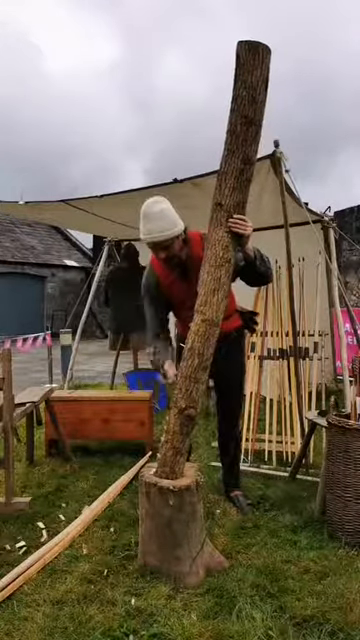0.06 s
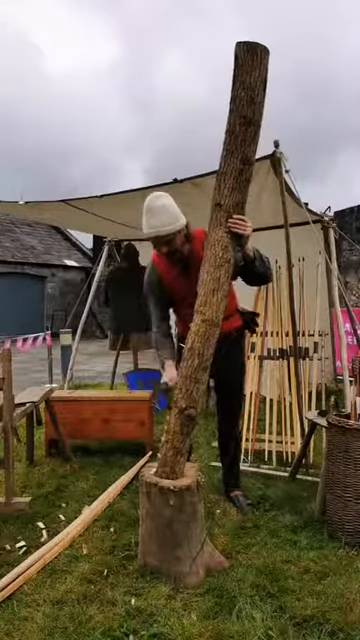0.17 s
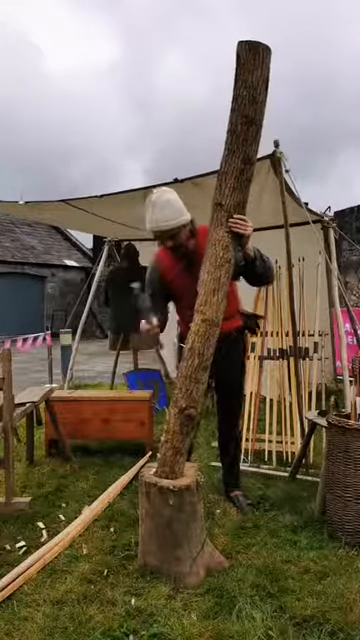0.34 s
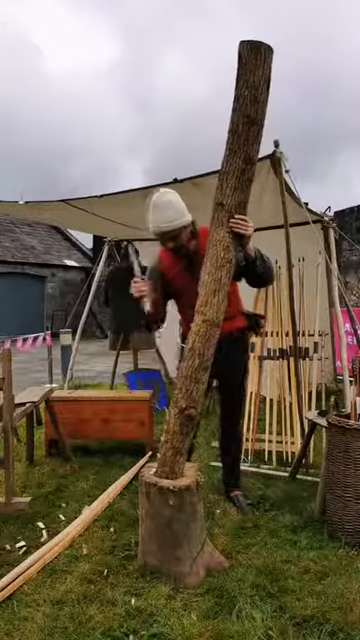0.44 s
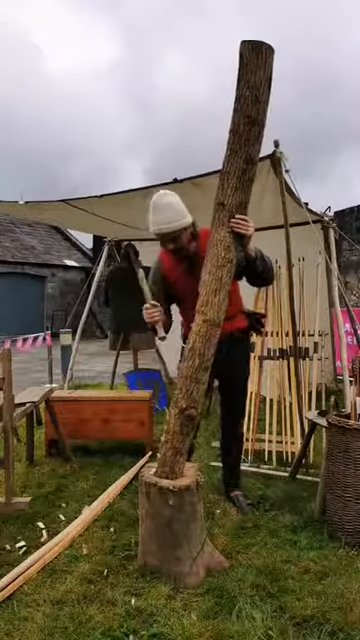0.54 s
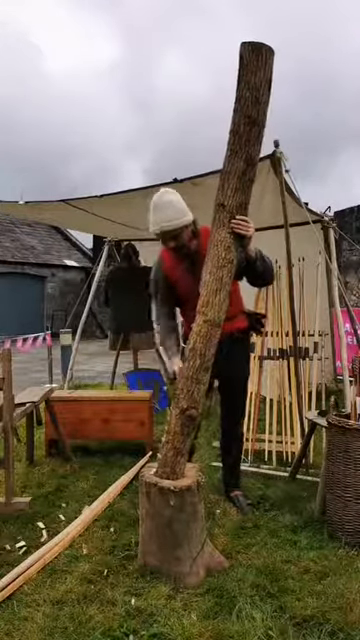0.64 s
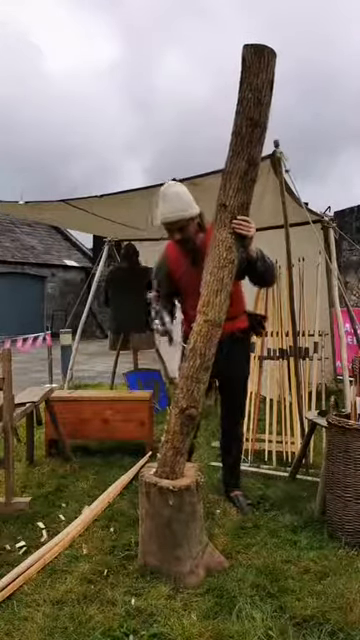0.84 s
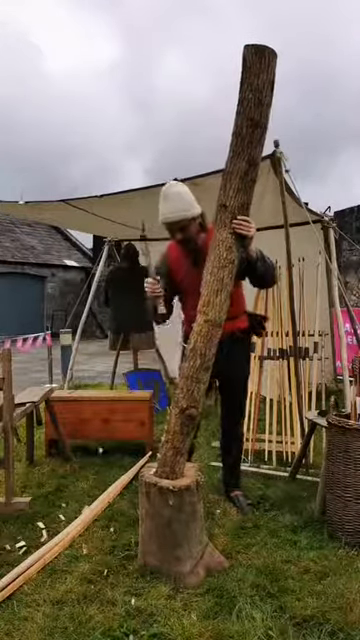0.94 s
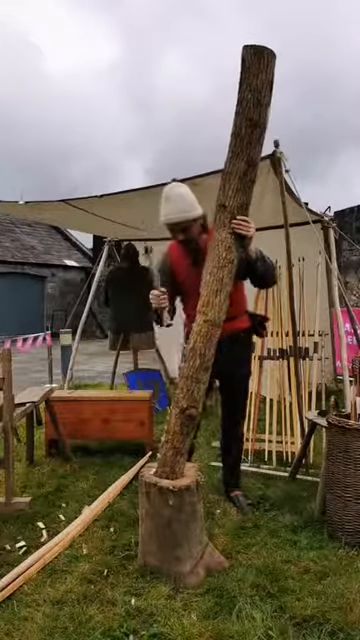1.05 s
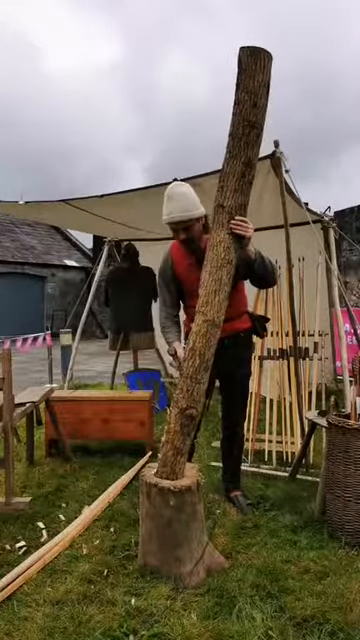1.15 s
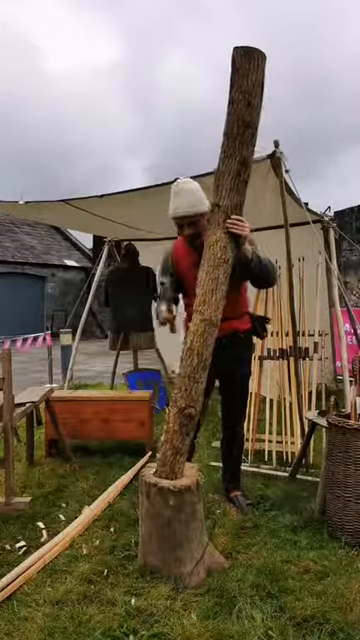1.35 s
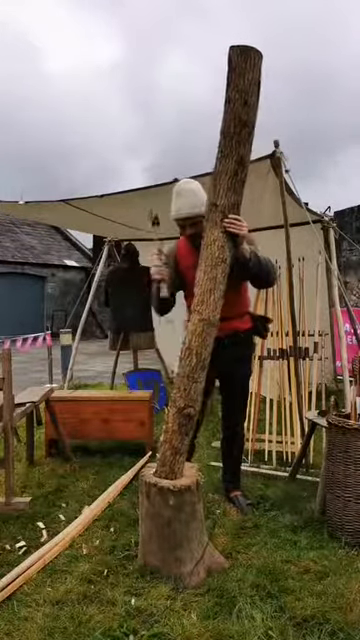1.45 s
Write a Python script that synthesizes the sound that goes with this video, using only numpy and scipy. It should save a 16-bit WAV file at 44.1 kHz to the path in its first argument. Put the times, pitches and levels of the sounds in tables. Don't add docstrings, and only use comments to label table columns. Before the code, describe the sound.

A side axe chops three times into a wooden stave, evenly spaced, in an open yard

```python
import sys
import numpy as np
from scipy import signal
from scipy.fft import rfft, irfft
from scipy.io import wavfile
from scipy.ndimage import uniform_filter1d

SR = 44100
rng = np.random.default_rng(int(sys.argv[2]) if len(sys.argv) > 2 else 0)


def dump(signal):
    limited = np.clip(np.atleast_2d(signal).T, -1, 1)
    pcm = np.round(limited * 32767).astype(np.int16)
    wavfile.write(sys.argv[1], SR, pcm)


def gain_from_db(level_db):
    decades = np.asarray(level_db, float) / 20
    return 10 ** decades


N = 66150


def read(points, hz):
    f, value = np.transpose(points)
    return np.interp(np.log(hz + 1), np.log(f + 1), value)


def evened(x):
    return x / np.sqrt(np.mean(x ** 2) + 1e-20)


def add(mix, start_s, sound):
    part = mix[round(start_s * SR):][:len(sound)]
    part += sound[:len(part)]


def ring(hz, db, t60_s, turn=0, rise_s=0.0002):
    t = np.arange(SR // 2) / SR
    decay = gain_from_db(db - 60 * t / max(t60_s, .003))
    onset = 1 - np.exp(-(t / rise_s) ** 2)
    return decay * np.sin(2 * np.pi * (hz * t + turn)) * onset


def filtered(x, order, edge_hz, kind):
    return signal.sosfilt(signal.butter(order, edge_hz, kind, fs=SR, output='sos'), x)


def noise(colour, patchy_db, t60=None):
    hz = np.fft.rfftfreq(256, 1 / SR)
    patches = rng.standard_normal((N // 64 + 9, 129))
    patches = uniform_filter1d(patches, size=24, axis=0)
    patches = evened(uniform_filter1d(patches, size=3, axis=1)).T
    _, t, z = signal.stft(rng.standard_normal(N), SR, nperseg=256, noverlap=192)
    fall_db = 0 if t60 is None else -60 * t / read(t60, hz)[:, None]
    z = z * gain_from_db(patchy_db * patches[:, :len(t)] + fall_db)
    x = signal.istft(z, SR, nperseg=256, noverlap=192)[1][:N]
    gain = gain_from_db(read(colour, np.fft.rfftfreq(2 * N, 1 / SR)))
    return evened(irfft(rfft(x, 2 * N) * gain)[:N])


# frequency in Hz, density in dB per Hz.
HUSH_COLOUR = [(20, -15), (346, -8), (605, -10), (973, -8), (1290, -11), (3150, -29), (6000, -39),
               (9000, -53), (16000, -57)]
# time in seconds, level in dB.
GUSTS = [(0, -66.5), (.3, -68.5), (.35, -82), (.42, -77), (.6, -74), (.68, -67.5), (.72, -58), (.82, -63.5),
         (.87, -76), (1.1, -72.5), (1.15, -70.5), (1.22, -58), (1.35, -63), (1.4, -85.5), (1.5, -74)]
# time in seconds, level in dB, crispness in dB.
STIR = [(0, -76.5, 0), (0.098, -75.5, -6), (.18, -72.5, -10.5), (0.5, -87, -14), (.6, -68, -11),
        (.64, -72.5, -4), (.74, -65.5, -15), (0.849, -65, 2.5), (.93, -72.5, -3), (1.05, -80, 2),
        (1.121, -73.5, -5), (1.2, -74.5, -18), (1.33, -56.5, -3), (1.42, -77, 8.5), (1.5, -82, 6)]
# frequency in Hz, density in dB per Hz.
RUSTLE_COLOUR = [(200, -9), (400, -2.5), (700, -5.5), (1300, -8.5), (2400, -15), (4000, -41.5),
                 (9000, -79.5)]
# frequency in Hz, density in dB per Hz.
CRISP_COLOUR = [(1200, -29.5), (2000, 0), (3500, -5), (5500, -12), (7600, -21), (9500, -44), (14000, -64.5)]


def yard():
    t = np.arange(N) / SR
    hush = gain_from_db(-69) * noise(HUSH_COLOUR, 2.2)

    hum_hz, width_hz = 970, 80
    hum_colour = [(hum_hz + k * width_hz, -13 * abs(k)) for k in range(-7, 8)]
    hum = gain_from_db(-77) * noise(hum_colour, 2.5)

    wind_colour = [(10, -10.5), (40, 0.5), (70, -7.5), (150, -12.5), (250, -56.0), (1500, -100)]
    wind = gain_from_db(np.interp(t, *np.transpose(GUSTS))) * noise(wind_colour, 2.1)

    s, level_db, crisp_db = np.transpose(STIR)
    dull = noise([(80, -50.5)] + RUSTLE_COLOUR, 1.4)
    crisp = gain_from_db(np.interp(t, s, crisp_db)) * noise(CRISP_COLOUR, 0.54)
    rustle = gain_from_db(np.interp(t, s, level_db)) * (dull + crisp)
    return hush + hum + wind + rustle


# frequency in Hz, level in dB, t60 in seconds.
STEEL = [(2236, -26, .24), (2250, -36, .3), (2800, -16, .03), (3526, -1, .055), (5800, -5, .009),
         (3515, -26, .28), (5383, -27, .26), (5402, -40, .4), (6100, -9, .007)]


def clink():
    out = np.zeros(N)
    add(out, .8879, sum(ring(hz, -32.5 + db, t60_s) for hz, db, t60_s in STEEL))
    return out


# start in seconds, level in dB, low edge in Hz,
# high edge in Hz, t60 in seconds.
SCRAPES = [
    (.8865, -57, 4500, 10500, .055),
    (1.3245, -45, 2000, 5300, .025),
    (.848, -54, 2500, 7500, .02),
    (1.342, -55, 2500, 7200, .03),
    (1.389, -54, 1500, 3800, .03),
    (1.097, -61, 1500, 6500, .03),
    (.2085, -56, 900, 6000, .1),
    (.7435, -50, 900, 2200, .2),
    (1.254, -54, 600, 3000, .2),
]


def scrapes():
    out, t = np.zeros(N), np.arange(4096) / SR
    for s, db, low_hz, high_hz, t60_s in SCRAPES:
        grit = evened(filtered(rng.standard_normal(4096), 4, [low_hz, high_hz], 'band'))
        add(out, s, gain_from_db(db - 60 * t / t60_s) * np.minimum(t / 0.0017, 1) * grit)
    return out


# start in seconds, peak in dB, frequency in Hz, t60 in seconds.
TICKS = [(.078, -55, 2062, 0.019), (.079, -59.5, 5240, 0.0051), (0.095, -56, 1314, 0.11),
         (0.554, -70, 6045, .03), (.600, -59.5, 3575, 0.011), (0.616, -63.5, 3723, .03),
         (.678, -55, 264, 0.11), (.708, -70, 6920, 0.018), (.815, -49.5, 2350, .04),
         (0.848, -52.5, 3520, 0.019), (0.99, -54.5, 1537, 0.019), (1.098, -56, 3240, 0.011),
         (1.098, -62.5, 1684, 0.023), (1.115, -64, 4120, 0.017), (1.206, -55.5, 1387, 0.028),
         (1.232, -82.5, 5900, 0.017), (1.2878, -38.5, 3070, 0.014), (1.297, -48, 3420, .015),
         (1.329, -46, 3000, 0.014), (1.325, -38.5, 3600, 0.009), (1.343, -36.5, 2920, 0.0058),
         (1.388, -50, 3010, 0.016), (0.886, -67, 7600, 0.026), (0.892, -69, 9980, 0.0073),
         (1.355, -71, 4910, 0.36), (1.427, -57.5, 1584, 0.054), (1.446, -60, 1720, 0.089),
         (1.472, -63, 1815, 0.13), (.05, -65, 153, 0.33), (.852, -55.5, 640, 0.4), (.868, -50.5, 838, .2),
         (.885, -54.5, 634.6, 0.22), (0.883, -50, 1292, .08), (.842, -49, 728, 0.026)]


def ticks():
    out, spread = np.zeros(N), rng.uniform(-1, 1, (len(TICKS), 14, 2))
    for (s, db, hz, t60_s), grains in zip(TICKS, spread):
        add(out, s, ring(hz, db, t60_s, rise_s=0.000364))
        for late, pitch in grains:
            add(out, s + .004 * (late + .6), ring(hz * 1.7 ** pitch, db - 10, .012, rise_s=.001))
    return out


# frequency in Hz, t60 in seconds.
WALL_T60 = [(300, 0.43), (1000, 0.099), (3000, 0.32), (5000, 0.25), (8000, 0.54)]


def tail(colour, near_db, far_db):
    t = np.arange(N) / SR
    near = noise(colour, 1.8, WALL_T60) * np.clip((t - .008) / 0.0017, 0, 1)
    far_s, spread_s = 0.11, 0.051
    far = noise(colour, 1.5) * np.exp(-((t - far_s) / spread_s) ** 2)
    return gain_from_db(near_db) * near / np.linalg.norm(near) + gain_from_db(far_db) * far / np.linalg.norm(far)


# frequency in Hz, level in dB.
WALL_COLOUR = [(200, -22.5), (560, -22), (800, 1), (1100, -5), (1320, -2), (1560, -14.5), (2200, -15),
               (4000, -34.5)]
# start in seconds, bite t60 in seconds, near dB, far dB.
THROWS = [
    (.214, 0.032, -37.5, -54),
    (.751, 0.045, -40.5, -57),
    (1.263, 0.029, -36.5, -58),
]


def walls():
    out = np.zeros(N)
    evening = 0.38
    for chop, (s, t60_s, near_db, far_db) in enumerate(THROWS):
        bite = sum((-1) ** j * ring(mode[0], evening * mode[2 + chop], t60_s)
                   for j, mode in enumerate(STAVE))
        add(out, s, signal.fftconvolve(bite, tail(WALL_COLOUR, near_db, far_db))[:N])
    return out


# start in seconds, level in dB, t60 in seconds, tilt in dB per octave,
# level thrown into the yard in dB.
CRACKS = [
    (0.2138, -19.5, 0.029, -2, -20),
    (0.7496, -17, 0.034, 0.76, -18.5),
    (1.2618, -13.5, 0.02, -1, -18),
]
# frequency in Hz, density in dB per Hz.
CRACK_COLOUR = [(1060, -30.5), (1800, -7.5), (2410, -16.5), (4440, -17.5), (6690, -24.5), (7810, -34),
                (12800, -51), (15900, -61)]
# frequency in Hz, level in dB.
AIR_COLOUR = [(500, -31), (1500, -2.5), (2500, 2.5), (4500, -3), (7000, -14.5), (8400, -35.5),
              (13000, -58.5)]


def cracks():
    out, t, hz = np.zeros(N), np.arange(4096) / SR, np.fft.rfftfreq(4096, 1 / SR)
    rise_s, hold_s = 0.0036, 0.0031
    for s, db, t60_s, tilt_db, yard_db in CRACKS:
        snaps = rng.standard_normal(4096) * gain_from_db(3.1 * rng.exponential(1, 4096))
        colour_db = read([(600, -33.5)] + CRACK_COLOUR, hz) + tilt_db * np.log2(hz / 3000 + .01)
        spray = evened(irfft(rfft(snaps) * gain_from_db(colour_db)))
        shape = np.minimum(t / rise_s, 1) * gain_from_db(-60 * np.maximum(t - hold_s, 0) / t60_s)
        add(out, s, gain_from_db(db) * shape * spray)
        add(out, s, gain_from_db(yard_db) * tail(AIR_COLOUR, 0, -13))
    return out


# start in seconds, level in dB, frequency in Hz, t60 in seconds.
THUDS = [
    (.216, -44, 110, .09),
    (.756, -40, 105, .1),
    (1.266, -40, 90, .1),
    (.256, -56, 330, .05),
    (.80, -50, 290, .06),
]


def block():
    out = np.zeros(N)
    for s, db, hz, t60_s in THUDS:
        add(out, s, ring(hz, db, t60_s, rise_s=0.0035))
    return out


# start in seconds, strength in dB, chop index, brightness in dB per octave.
JOLTS = [(0.2085, -40.5, 0, 0.5), (.2140, -5.5, 0, 6), (0.2150, -2.5, 0, -3), (0.2221, -3.5, 0, 0.5),
         (.7508, -28, 1, 10.5), (0.752, 0, 1, 1.5), (0.758, -17, 1, -3.5), (0.7637, -10, 1, -1),
         (1.2633, -28, 2, 3), (1.2632, -4, 2, -1), (1.2676, -2.5, 2, 3), (1.2727, -11.5, 2, -1.5)]
# frequency in Hz, t60 in seconds, level in dB at chops 1, 2 and 3.
STAVE = [(288.7, 0.1, -34, -18, -24), (420.5, 0.045, -30, -18, -16), (523, 0.06, -32, -17.5, -17),
         (640, 0.092, -6, -8, -7.5), (805, 0.13, -23.5, -22, -18.5), (861, 0.064, -9.5, -11.5, -9),
         (1072.4, 0.059, 5.5, 2, 1.5), (1293, 0.06, -6, -10, 3.5), (1515, 0.0251, -2.5, 4.5, -7),
         (1866, 0.038, -22, -20.5, -11), (1891, 0.01, -24, -3.5, -12), (2347, 0.034, -19, -17.5, -15.5),
         (2800, 0.02, -28, -14.5, -17), (3584, 0.014, -19.5, -22.5, -6.5)]
# time in seconds, drop in dB, stiffness as pitch ratio.
SEATS = [
    (0.2280, -9, 1.0),
    (0.7580, -5, 1.012),
    (1.2750, -8, 1.0),
]


def stave():
    out, t = np.zeros(N), np.arange(SR // 2) / SR
    turns = rng.random((len(SEATS), len(STAVE)))
    for s, strength_db, chop, tilt_db in JOLTS:
        chop = round(chop)
        seat_s, drop_db, stiffness = SEATS[chop]
        seated = np.clip((t + s - seat_s) / .0012, 0, 1)
        for mode, turn in zip(STAVE, turns[chop]):
            hz, t60_s = mode[:2]
            db = strength_db - 8.5 + mode[2 + chop] + tilt_db * np.log2(hz / 1000)
            rise_s = 0.79 / min(hz, 1200)
            damping = gain_from_db(drop_db * min(hz / 950, 1) ** 2 * seated)
            add(out, s, ring(hz * stiffness, db, t60_s, turn, rise_s) * damping)
    return filtered(out, 3, 210, 'high')


def scene():
    background = yard() + clink() + scrapes() + ticks()
    chops = walls() + cracks() + block() + stave()
    return (background + chops)[None]


def top_cut(x):
    return signal.sosfilt(signal.butter(12, 16060, fs=SR, output="sos"), x)


def record(dry):
    ceiling, knee = .95, 3.
    deep = signal.sosfiltfilt(signal.butter(2, 170, fs=SR, output='sos'), dry)
    level = uniform_filter1d(abs(signal.hilbert(dry)), size=24, axis=1)
    held = (dry - deep) / (0.5 + (level / ceiling) ** knee) ** (1 / knee)
    held = signal.sosfiltfilt(signal.butter(2, 120, 'high', fs=SR, output='sos'), held)
    return top_cut(held + deep)


dry = scene()
out = record(dry)
dump(out)
```